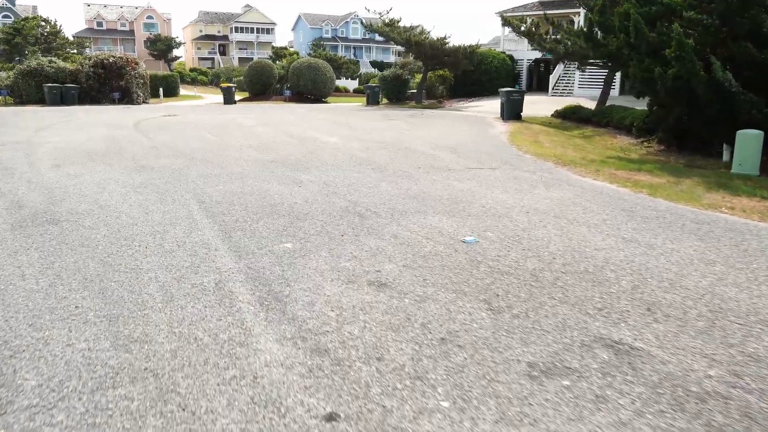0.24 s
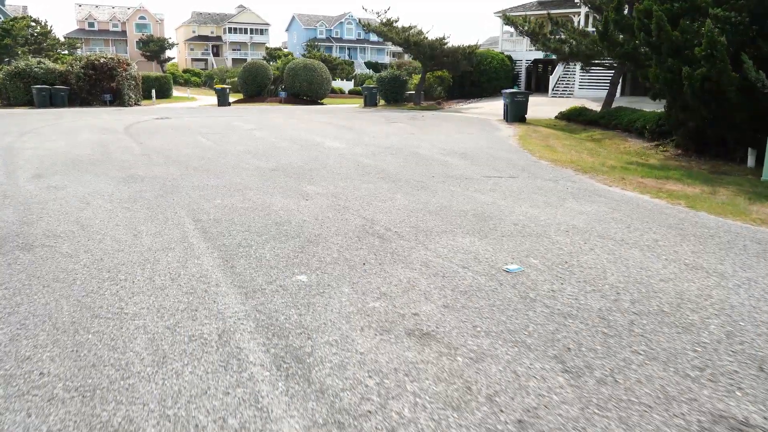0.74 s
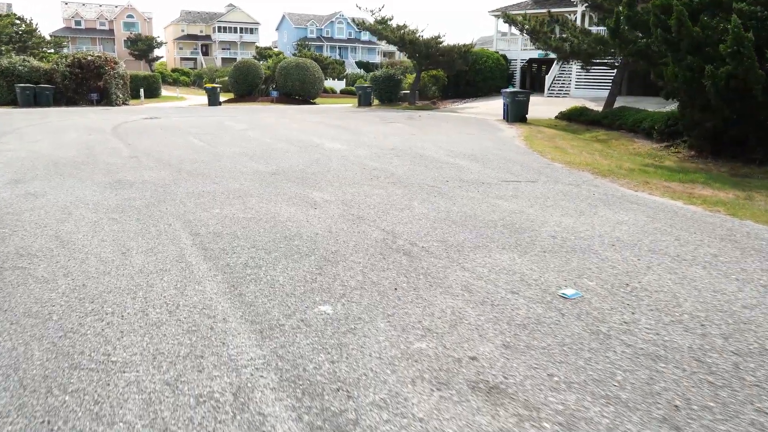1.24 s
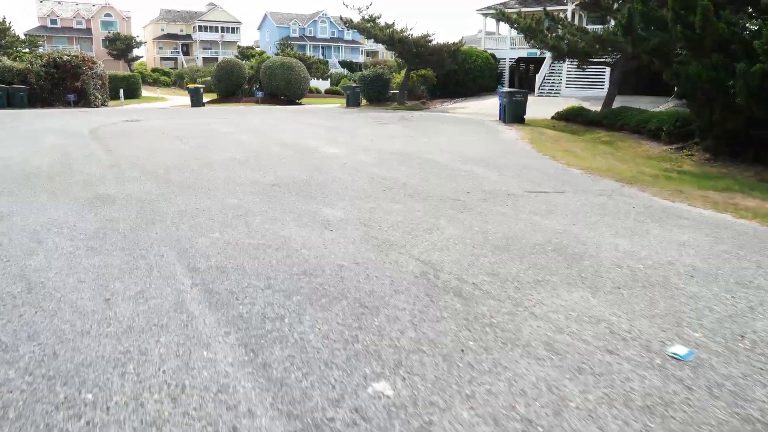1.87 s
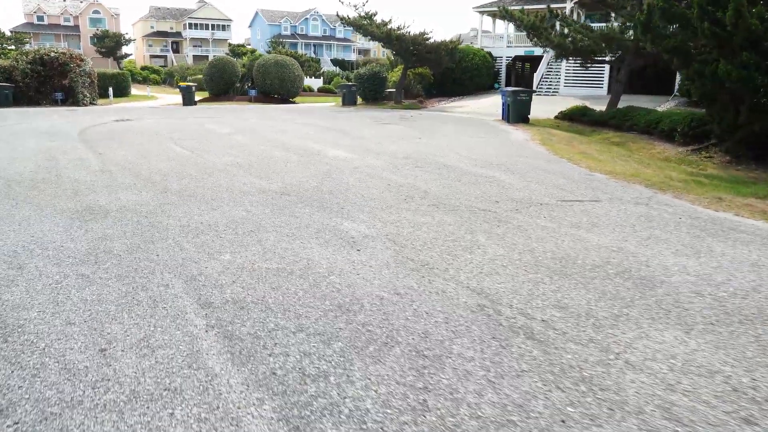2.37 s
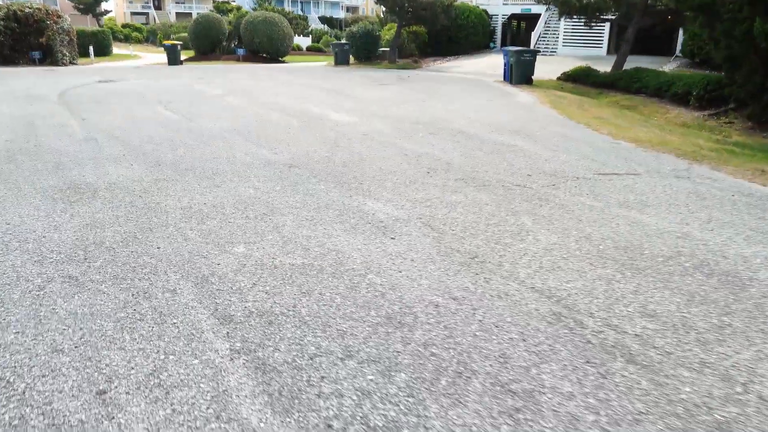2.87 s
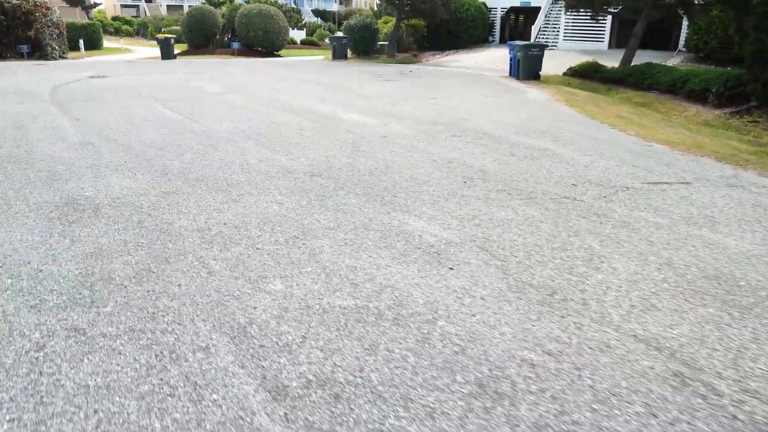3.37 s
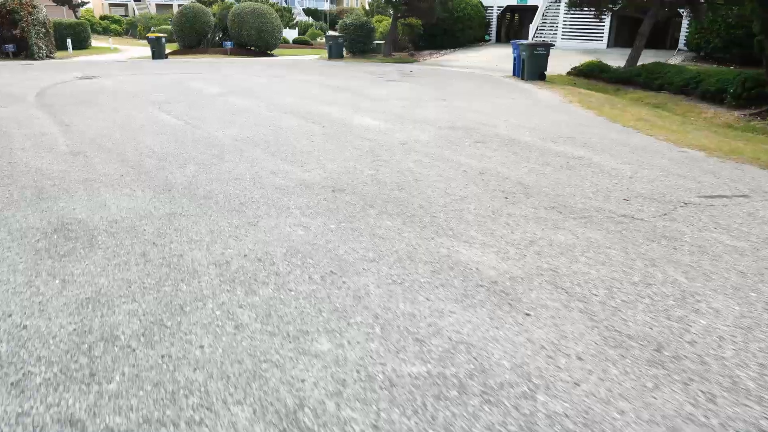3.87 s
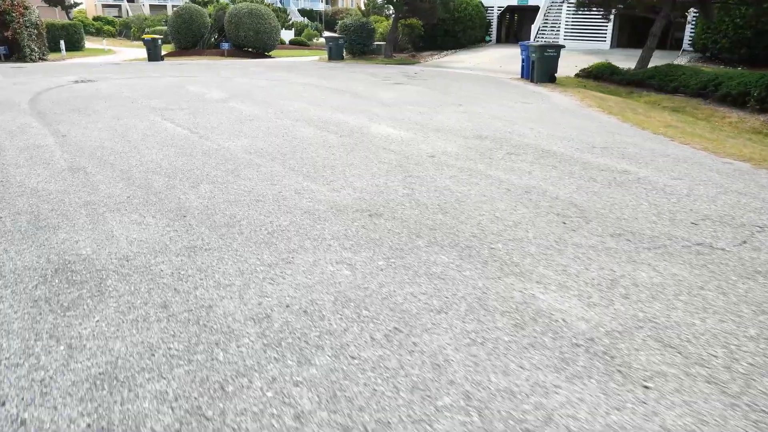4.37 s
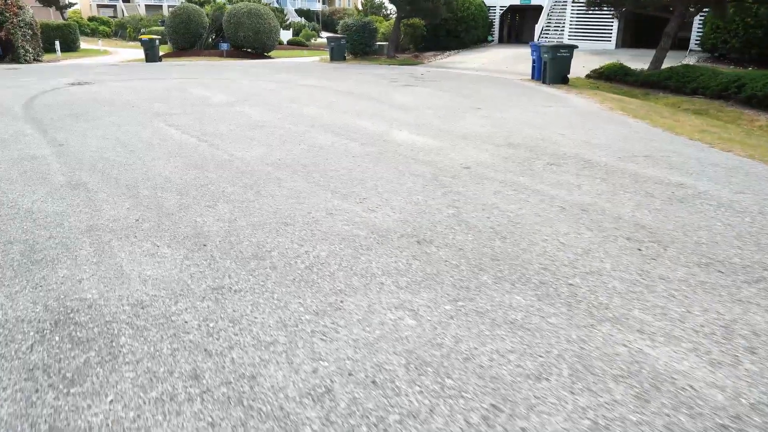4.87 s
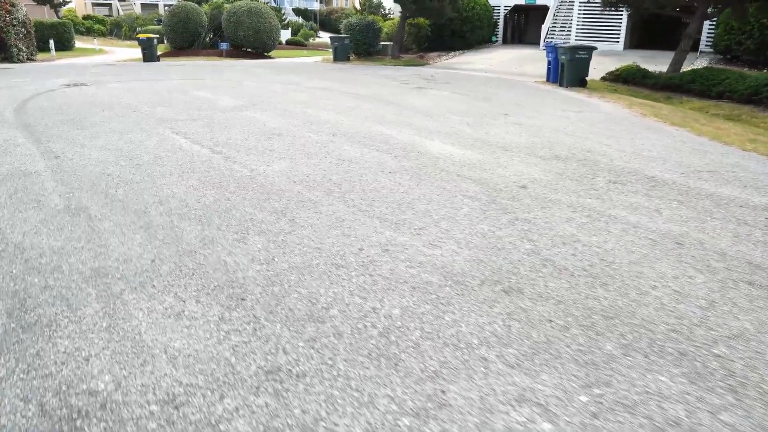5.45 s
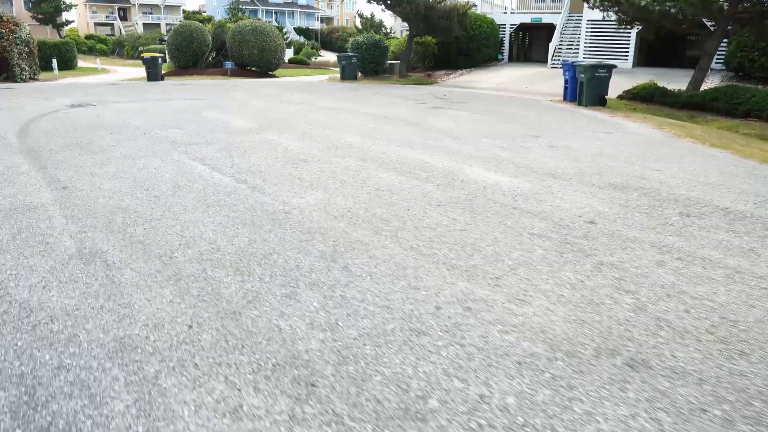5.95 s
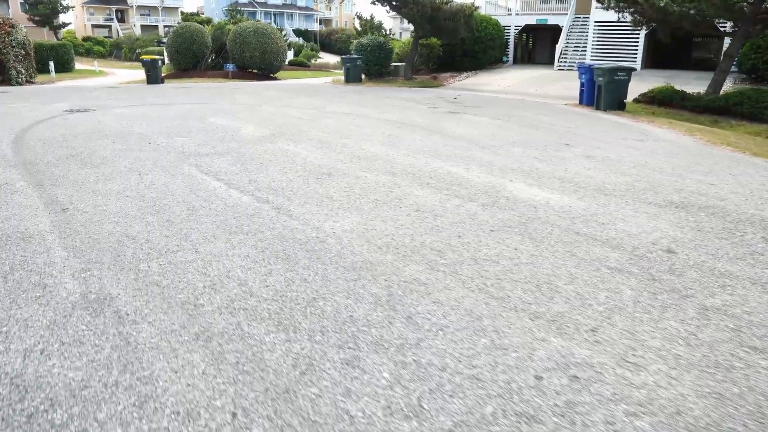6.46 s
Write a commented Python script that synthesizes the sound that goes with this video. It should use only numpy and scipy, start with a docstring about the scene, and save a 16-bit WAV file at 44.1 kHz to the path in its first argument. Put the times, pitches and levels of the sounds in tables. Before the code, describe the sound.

On a quiet residential street, thin rising bird whistles echo over soft wind buffeting and sparse footsteps, then a closer bird sings quick slurred notes.

```python
"""Wind rumbles on the microphone over a distant wash and hum, all made from filtered noise and sines.
Far birds give thin notes and a repeated rising whistle, made from slightly shaky sine waves.
Grit snaps and soles tap and scuff the asphalt: short noise bursts, dying sines and grainy noise.
A nearer bird joins with sliding, falling and chipped sine notes, then a buzzy one.
The quiet residential street throws the birds' songs back as echoes and a tail."""
import sys
import numpy as np
from scipy import signal
from scipy.fft import rfft, irfft, next_fast_len
from scipy.io import wavfile
from scipy.ndimage import uniform_filter1d

SR = 44100
rng = np.random.default_rng(int(sys.argv[2]) if len(sys.argv) > 2 else 0)


def unload_wav(signal):
    """Save mono or channel-first audio to the path in sys.argv[1] as 16-bit WAV at rate SR, clipped to [-1, 1]."""
    wavfile.write(
        sys.argv[1],
        SR,
        np.round(np.clip(np.atleast_2d(signal).T, -1, 1) * 32767).astype(np.int16),
    )


N = 295734
TIME = np.arange(N) / SR  # seconds


def amp(db):
    """Turns decibels into a multiplier."""
    return 10 ** (np.asarray(db) / 20)


def unit(x):
    """Scales a sound to an average strength (rms) of 1."""
    return x / np.sqrt(np.mean(x ** 2) + 1e-20)


def add(mix, s, sound):
    """Mixes a sound in at time s, cutting off whatever runs past the end."""
    part = mix[max(round(s * SR), 0):][:len(sound)]
    part += sound[:len(part)]


def level(curve):
    """Multiplier over the whole scene, drawn through rows of (time [s], level [dB])."""
    return amp(np.interp(TIME, *np.transpose(curve)))


def noise(colour, size=N):
    """Noise of rms 1 whose spectrum passes through rows of (frequency [Hz], level [dB])."""
    hz, db = np.transpose(colour)
    padded = next_fast_len(size)
    f = np.fft.rfftfreq(padded, 1 / SR)
    gain = amp(np.interp(np.log(f + 1), np.log(hz + 1), db))
    spectrum = rfft(rng.standard_normal(padded)) * gain
    return unit(irfft(spectrum, padded)[:size])


def drift(rate_hz, size=N):
    """Random wandering of rms about 0.8: straight lines between random points, two per cycle."""
    knots = rng.standard_normal(size=512)
    return np.interp(np.arange(size) / SR * rate_hz * 2, np.arange(len(knots)), knots)


def tone(hz, gain, waver, flutter_db, overtone_db=-42):
    """A bird's whistle: a near sine, slightly unsteady in pitch (waver) and strength (flutter)."""
    size = len(hz)
    phase = 2 * np.pi * np.cumsum(hz * (1 + waver * drift(177.4, size))) / SR
    fade = signal.windows.tukey(size, min(0.0027 * SR / size, 1))  # soft ends
    flutter = amp(flutter_db * drift(58.8, size))
    wave = np.sin(phase) + amp(overtone_db) * np.sin(2 * phase)
    return gain * fade * flutter * wave * np.sqrt(2)


def eddies(colour, steadiness=1.0):
    """Low turbulence, evened out so that the gusts set its strength."""
    flow = noise(colour)
    power = abs(signal.hilbert(flow)) ** 2 / 2
    local = np.sqrt(uniform_filter1d(power, size=2500) + 1e-9)
    return flow / local ** steadiness


# strength of the breeze, before gusts and trims: (time [s], level [dB])
WIND = [(0.0, -35), (0.13, -36.5), (0.45, -34), (0.8, -40), (1.62, -37.5), (1.81, -36.5), (2.02, -31.5),
        (2.52, -37.5), (2.73, -35), (2.95, -34), (3.4, -33), (4.35, -36), (5.49, -46), (5.86, -34),
        (6.42, -41.5), (6.71, -35.5)]
# gusts, and one lull, that ride on the breeze: (middle [s], half-width [s], lift [dB])
GUSTS = [(.07, 0.014, 3), (.24, 0.072, 6.5), (.39, 0.045, 5.5), (.64, 0.055, 6.5), (1.58, 0.093, 8),
         (1.878, 0.023, 12.5), (2.49, 0.1, 12.5), (2.84, 0.097, 6), (3.02, 0.056, 6.5), (3.26, 0.065, 9),
         (3.56, 0.037, 12.5), (3.952, .08, 5), (4.7, 0.37, -4), (5.3, 0.19, 5), (5.83, 0.023, 8),
         (6.35, 0.078, 10.5)]
# tone colour of the slow push of the wind: (frequency [Hz], level [dB])
WIND_COLOUR = [(5, 5), (12, -15.5), (20, 7.5), (30, -1.5), (42, -15.5), (60, -30), (110, -66), (500, -101),
               (4000, -130)]
# tone colour of the quicker buffeting: (frequency [Hz], level [dB])
BUFFET_COLOUR = [(20, -16), (45, 1.5), (62, 5.5), (90, -8), (140, -10.5), (250, -32), (600, -67),
                 (4000, -100)]
BUFFET_FOLLOWS = .9  # dB of buffeting for each dB of wind


def wind(push_db=6, buffet_db=-17):
    """Large eddies push on the microphone and smaller ones buffet it; both follow breeze and gusts."""
    lift_db = sum(db * np.exp(-((TIME - s) / width) ** 2) for s, width, db in GUSTS)
    strength = level(WIND) * amp(lift_db)
    push = amp(push_db) * strength * eddies(WIND_COLOUR)
    buffet = amp(buffet_db) * strength ** BUFFET_FOLLOWS * eddies(BUFFET_COLOUR)
    return push + buffet


WASH_DB = -47  # distant surf and traffic, typical level
# tone colour of that wash: (frequency [Hz], level [dB])
WASH_COLOUR = [(150, -17), (300, -9), (450, -10.5), (620, -6), (800, -4), (1050, -6.5), (1400, -11),
               (2000, -17), (3100, -25.5), (4500, -30), (6300, -33), (8000, -38), (11000, -40.5),
               (15500, -43)]
# low drone of distant engines, before its trim: (time [s], level [dB])
DRONE = [(0.0, -47.5), (0.88, -56.5), (1.17, -50.5), (2.37, -55.5), (2.59, -49), (5.06, -52.5),
         (5.66, -47.5), (6.71, -52)]
# tone colour of the drone: (frequency [Hz], level [dB])
DRONE_COLOUR = [(50, -1.5), (100, 3.5), (150, -6), (200, -3), (280, -13), (420, -14), (800, -19.5),
                (4000, -84)]
# a far machine hum: (typical pitch [Hz], typical peak level [dB], half faded in [s], half faded out [s])
HUM = [(106.3, -51.5, 0.78, 3.7), (117.2, -60.5, 4.5, 8.4), (198, -65, .9, 7.7)]
# spells of a faint high sizzle: (start [s], length [s], typical level [dB])
SIZZLES = [(0, 0.81, -73), (1.123, 0.36, -65), (1.47, .7, -66.5), (4.2, 0.41, -67), (4.47, 0.67, -63),
           (4.96, 0.53, -64.5), (6.05, .75, -83)]
# tone colour of the sizzle: (frequency [Hz], level [dB])
SIZZLE_COLOUR = [(5200, -3), (6200, 0), (6750, 1.5), (7400, -7), (8200, -3.5), (8850, -1), (9400, -7),
                 (10000, -7), (11000, -22), (12200, -15), (13000, -7), (14300, -24)]
SIZZLE_RISE_S, SIZZLE_FALL_S = 0.19, 0.19


def background(drone_db=2):
    """Filtered noise makes the wash, drone and sizzle; sines of wandering pitch make the hum."""
    out = amp(WASH_DB + 0.44 * drift(5.4)) * noise(WASH_COLOUR)
    out += amp(drone_db) * level(DRONE) * noise(DRONE_COLOUR)
    for hz, db, start, end in HUM:
        present = np.clip(np.minimum(TIME - start, end - TIME) / .5 + .5, 0, 1)
        strength = present * amp(db + 3.3 * drift(4))
        wandering_hz = hz * (1 + 0.02855 * drift(7))
        out += strength * np.sin(2 * np.pi * np.cumsum(wandering_hz) / SR)
    spells = np.zeros(N)
    for s, length, db in SIZZLES:
        rise = (TIME - s) / SIZZLE_RISE_S
        fall_away = (s + length - TIME) / SIZZLE_FALL_S
        spells += amp(db) * np.clip(np.minimum(rise, fall_away), 0, 1)
    return out + amp(1.8 * drift(6)) * spells * noise(SIZZLE_COLOUR)


# the far bird's rising whistles, levels before the street: (start [s], level [dB], length [s],
# starting pitch [Hz], pitch aimed for [Hz], held note level [dB], held note length [s])
WHISTLES = [(0.918, -60, 0.24, 2575, 2606, -76, 0.22), (1.274, -56.5, 0.17, 2400, 2610, -77, .12),
            (1.593, -56.5, 0.19, 2590, 2597, -72, 0.26), (1.924, -59.5, 0.17, 2350, 2490, -65, 0.088),
            (2.366, -55.5, .2, 2343, 2973, -74, .15), (2.815, -56.5, 0.28, 2430, 2925, -70, 0.16),
            (3.201, -56.5, .15, 2520, 2910, -64, 0.14), (3.577, -59, 0.13, 2530, 2766, -57, 0.18),
            (4.057, -53, 0.17, 2465, 2800, -61, 0.19)]
# shape of a whistle: (share of its length [0-1], share of the way to the pitch aimed for [0-1],
# level added [dB])
WHISTLE_SHAPE = [(0, 0, 1), (.25, .15, -4.5), (0.501, .5, 3), (.7, 0.52, -4), (1, 0.69, -10)]
# thin notes from far gardens, levels before the street:
# (start [s], length [s], pitch [Hz], level [dB], roughness [times rough_waver])
THIN_NOTES = [(0.01, 0.044, 5960, -66.5, 0.22), (0.824, 0.25, 3320, -73, 0.8),
              (1.055, .35, 5740, -74.5, 0.9), (1.292, 0.11, 3100, -66, 1.25),
              (1.796, 0.2, 4900, -71.5, 0.3), (2.12, 0.19, 7530, -76, 0.7), (2.857, 0.14, 4780, -68, 1.1),
              (3.9, 0.1, 2930, -61.5, 0.37), (4.41, 0.05, 2920, -60, 0.25), (5.186, 0.067, 3130, -59, 0.25),
              (5.96, 0.066, 4820, -71, 0.6), (6.593, 0.1, 4870, -67.5, 0.4)]
HELD_HZ, HELD_AFTER_S, HELD_FADE_DB = 2914, .1, -3  # the thin held note that joins each whistle
WHISTLE_ROUGH, HELD_ROUGH = 0.81, .27  # times rough_waver


def far_birds(rough_waver=0.0363):
    """Rising whistles with a held note, and thin notes: sines that jitter in pitch by their roughness."""
    out = np.zeros(N)
    share, rise, shape_db = np.transpose(WHISTLE_SHAPE)
    for s, db, length, start_hz, aim_hz, held_db, held_s in WHISTLES:
        u = np.linspace(0, 1, int(length * SR))
        hz = start_hz + (aim_hz - start_hz) * np.interp(u, share, rise)
        gain = amp(db + np.interp(u, share, shape_db))
        add(out, s, tone(hz, gain, waver=WHISTLE_ROUGH * rough_waver, flutter_db=4.0))
        held = amp(held_db + np.linspace(0, HELD_FADE_DB, int(held_s * SR)))
        held_hz = np.full(len(held), HELD_HZ)
        add(out, s + HELD_AFTER_S, tone(held_hz, held, waver=HELD_ROUGH * rough_waver, flutter_db=6.5))
    for s, length, hz, db, rough in THIN_NOTES:
        steady_hz = np.full(int(length * SR), hz)
        add(out, s, tone(steady_hz, amp(db), waver=rough * rough_waver, flutter_db=4.0))
    return out


# tone colour of a snapping grain of grit: (frequency [Hz], level [dB])
GRIT_COLOUR = [(2000, -35), (4200, -5), (6000, 2), (9000, 7.5), (12000, -3), (16000, 2)]


def snap(db, decay=0.0022):
    """A grain of grit cracks: a short bright burst with the given peak, dying over decay seconds."""
    burst = noise(GRIT_COLOUR, size=512) * np.exp(-TIME[:512] / decay)
    return amp(db) * burst / abs(burst).max()


def tap(hz, cycles=0.99):
    """A sole meets the road: a dead knock that swells and dies in about three cycles."""
    turns = hz * TIME[:1500]
    swell = turns / cycles * np.exp(1 - turns / cycles)
    return swell * np.exp(-(turns / 3.5) ** 2) * np.sin(2 * np.pi * turns)


# shoes on asphalt: (time [s], tap level [dB], tap pitch [Hz],
# scuff level before its swell [dB], scuff length [s], scuff pitch [Hz])
STEPS = [(1.973, -32.5, 1500, -53, 0.029, 1620), (4.387, -34, 980, -43, 0.02, 1750),
         (4.394, -29, 1750, -65, 0.041, 1900), (4.636, -39, 720, -40.5, 0.094, 298),
         (4.778, -21, 1070, -43, 0.03, 1090), (5.693, -36, 3800, -50.5, .012, 3780),
         (5.7032, -29.5, 1670, -36, 0.0098, 1500), (5.709, -35, 870, -38.5, 0.072, 313),
         (6.093, -49, 1900, -57, 0.033, 2160), (6.4157, -23, 970, -37, 0.12, 426),
         (6.423, -37, 416, -36, 0.033, 950)]
# grit snapping under the soles: (time [s], peak before its trim [dB])
GRIT = [(.513, -41), (.611, -51), (.765, -43), (.790, -46), (.996, -51), (1.065, -46), (1.19, -54),
        (5.619, -49)]


def footsteps(grain_db=3, sharp_db=-25, grit_db=1):
    """Each contact is a tap and a faint snap inside a grainy scuff; other grains of grit snap alone."""
    out = np.zeros(N)
    half = .2  # seconds of scuff on each side of its peak
    t = np.arange(-half, half, 1 / SR)
    for s, tap_db, tap_hz, scuff_db, length, scuff_hz in STEPS:
        add(out, s, amp(tap_db) * tap(tap_hz))
        add(out, s, snap(tap_db + sharp_db))
        rub_colour = [(scuff_hz / 6, -14), (scuff_hz / 2, -2), (scuff_hz * 0.91, 0),
                      (scuff_hz * 2.74, -13), (16000, -50)]
        rub = noise(rub_colour, len(t))
        grainy = unit(rub * amp(grain_db * drift(298, len(t))))
        swell = np.exp(-3 * abs(t) / length)
        add(out, s - half, amp(scuff_db) * swell * grainy)
    for s, db in GRIT:
        add(out, s, snap(db + grit_db))
    return out


ATTACK_SHARE, RELEASE_SHARE = .2, 0.17  # of a slur's length


def slur(length, turn, slide_s, first_hz, last_hz, first_db, last_db):
    """Pitch and gain of a slur: both follow one S-shaped slide from the first note to the last."""
    u = np.linspace(0, 1, int(length * SR))
    bend = np.tanh((u - turn) * length / slide_s)
    slide = (bend - bend[0]) / (bend[-1] - bend[0])
    envelope = np.minimum(1, np.minimum(u / ATTACK_SHARE, (1 - u) / RELEASE_SHARE))
    hz = first_hz + (last_hz - first_hz) * slide
    return hz, envelope * amp(first_db + (last_db - first_db) * slide)


KNEE_SHARE, KNEE_DROP = 0.77, 0.57  # the plunge starts at this share of length, this share of drop done
FALL_START_DB, FALL_END_DB = -12, 0.5  # level at the ends, against the knee


def fall(length, top_hz, bottom_hz, db):
    """Pitch and gain of a falling whistle: it swells as it sinks, then plunges at the knee."""
    u = np.linspace(0, 1, int(length * SR))
    knee = [0, KNEE_SHARE, 1]
    hz = top_hz + (bottom_hz - top_hz) * np.interp(u, knee, [0, KNEE_DROP, 1])
    return hz, amp(db + np.interp(u, knee, [FALL_START_DB, 0, FALL_END_DB]))


# Levels in the near bird's tables are before the street.
# falling whistles: (start [s], length [s], top pitch [Hz], bottom pitch [Hz], level at the knee [dB])
FALLS = [(2.282, 0.041, 4800, 3040, -61), (2.285, 0.08, 5700, 3530, -62), (2.693, 0.093, 6000, 3000, -55.5),
         (2.757, .048, 5180, 4500, -58), (3.936, .102, 6000, 2980, -54.5),
         (4.008, 0.072, 5050, 3544, -57.5), (4.191, 0.068, 5440, 3080, -56)]
# short straight chips: (start [s], length [s], starting pitch [Hz], final pitch [Hz], level [dB])
CHIPS = [(2.634, 0.015, 4320, 6000, -59), (2.675, .015, 4920, 6300, -63), (2.812, 0.0195, 3850, 3450, -56),
         (3.522, 0.019, 4100, 3200, -61), (3.865, .012, 4370, 6260, -54), (3.894, 0.022, 4180, 3150, -54.5),
         (4.385, 0.017, 2640, 2780, -53), (4.566, 0.0081, 4730, 6060, -56), (4.617, .017, 4220, 4020, -58),
         (4.858, 0.0203, 5100, 5850, -61), (5.287, 0.034, 2920, 2590, -51.5),
         (5.473, 0.05, 3040, 3250, -53.5), (5.818, 0.038, 4740, 5050, -51), (6.27, 0.067, 2950, 3480, -61),
         (6.473, 0.013, 7700, 7600, -59.5), (6.591, 0.022, 3410, 2850, -54.5)]
# slurs from one note to another: (start [s], length [s], middle of the slide [share of length],
# slide time [s], first pitch [Hz], last pitch [Hz], first level [dB], last level [dB])
SLURS = [(4.088, .075, .02, 0.01, 4360, 3790, -52, -48), (4.277, 0.14, 0.5, 0.014, 4980, 3860, -57, -46),
         (4.535, .042, 0.32, 0.013, 4680, 4830, -59, -54), (4.591, 0.08, .63, .009, 4920, 4080, -60, -47.5),
         (4.728, 0.042, 0.69, 0.012, 4020, 3250, -56, -45.5),
         (4.762, 0.041, 0.73, .02, 4070, 3680, -46, -54), (4.926, .029, 0.47, .015, 3770, 3220, -59, -40),
         (4.974, 0.037, 0.82, 0.014, 4900, 2420, -46.5, -36),
         (5.096, 0.07, 0.23, 0.03, 3600, 3380, -63, -30.5),
         (5.167, 0.13, 0.27, 0.035, 3400, 4190, -48, -41),
         (5.165, 0.13, 0.39, 0.033, 3750, 4464, -44, -45.5),
         (5.409, 0.063, 0.75, 0.013, 3070, 2420, -50.5, -46),
         (5.485, 0.11, 0.19, 0.039, 3880, 3280, -55, -33.5),
         (5.706, 0.17, .55, 0.0263, 3595, 4770, -43, -43.5),
         (5.942, 0.06, 0.27, 0.029, 3220, 3660, -50, -52),
         (5.983, 0.026, 0.62, 0.0089, 3120, 3730, -45.5, -51),
         (6.046, 0.041, 0.58, 0.012, 3550, 2570, -52.5, -41),
         (6.15, 0.096, 0.75, 0.014, 2920, 2180, -44, -53)]
BUZZ_START_S, BUZZ_S, BUZZ_DB = 6.368, 0.12, -41.5  # the buzzy note
BUZZ_HZ, BUZZ_SCOOP_HZ, BUZZ_SETTLE_S = 3180, 217, 0.0163  # starts sharp and settles
BUZZ_FADE_DB_PER_S = 57


def near_bird(buzz_hz=170, buzz_depth=0.05):
    """Sliding sines make slurs, falls and soft chips; one note buzzes as its pitch shakes fast."""
    out = np.zeros(N)
    for s, *syllable in SLURS:
        add(out, s, tone(*slur(*syllable), waver=0.0037, flutter_db=2.0))
    for s, *syllable in FALLS:
        add(out, s, tone(*fall(*syllable), waver=0.01, flutter_db=3.5))
    for s, length, from_hz, to_hz, db in CHIPS:
        hz = np.linspace(from_hz, to_hz, int(length * SR))
        add(out, s, tone(hz, amp(db), waver=0.018, flutter_db=2.5))
    t = TIME[:int(BUZZ_S * SR)]
    hz = BUZZ_HZ + BUZZ_SCOOP_HZ * np.exp(-t / BUZZ_SETTLE_S)
    shake = 1 + buzz_depth * np.sin(2 * np.pi * buzz_hz * t)
    gain = amp(BUZZ_DB - BUZZ_FADE_DB_PER_S * t)
    add(out, BUZZ_START_S, tone(hz * shake, gain, waver=0.021, flutter_db=-1.5))
    return out


def scatter(t60):
    """Sparse reflections of unit energy that build up, then die away by 60 dB in t60 seconds."""
    t = TIME[:SR]
    sparse = rng.standard_normal(SR) * (rng.random(SR) < 2000 / SR)  # about 2000 a second
    taps = sparse * amp(-60 * t / t60) * (1 - np.exp(-t / 0.017))
    return taps / np.linalg.norm(taps)


# echoes from the road and nearby walls: (delay [s], level against the direct sound [dB])
ECHOES = [(.004, -16.5), (.009, -11.5), (.017, -24)]


def street(x, direct_db, foliage_db, tail_db, t60):
    """The direct sound, a quick blur from foliage, single echoes and the street's thin tail."""
    response = amp(foliage_db) * scatter(t60=0.12) + amp(tail_db) * scatter(t60)
    response[0] += amp(direct_db)
    for delay, db in ECHOES:
        add(response, delay, amp([db + direct_db]))
    return signal.fftconvolve(x, response)[:N]


def scene():
    """Everything at the walker's microphone."""
    air = wind() + background()
    steps = footsteps()
    near = street(near_bird(), direct_db=-2.5, foliage_db=-10, tail_db=-20.0, t60=1.0)
    far = street(far_birds(), direct_db=-4.5, foliage_db=-6.5, tail_db=-3.5, t60=0.85)
    return (air + steps + near + far)[None]


EDGE_HZ = 15750


def record(dry):
    """The recorder's band limit: a filter removes what lies above EDGE_HZ."""
    low_pass = signal.firwin(511, EDGE_HZ, window=("kaiser", 9), fs=SR)
    return signal.oaconvolve(dry, low_pass[None], "same")


dry = scene()
out = record(dry)
unload_wav(out)
```